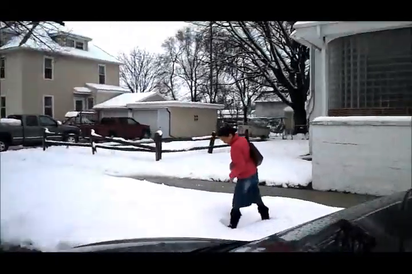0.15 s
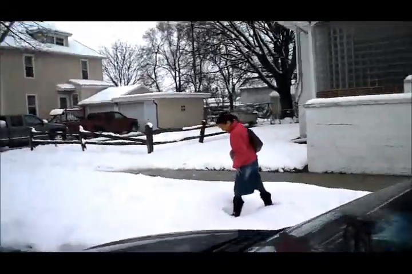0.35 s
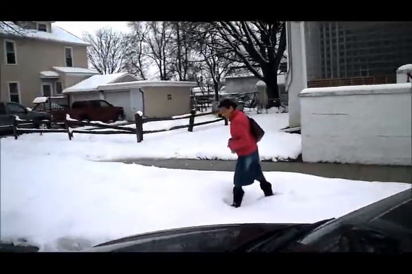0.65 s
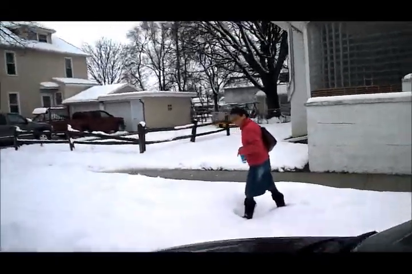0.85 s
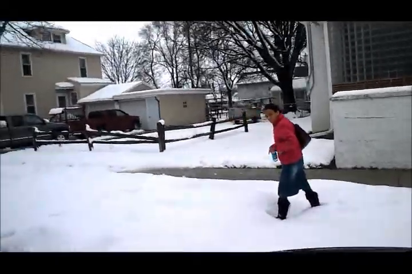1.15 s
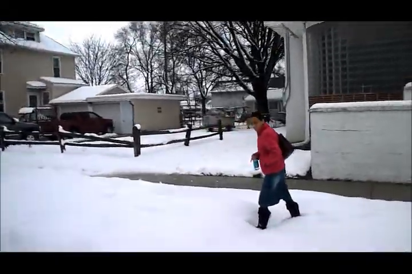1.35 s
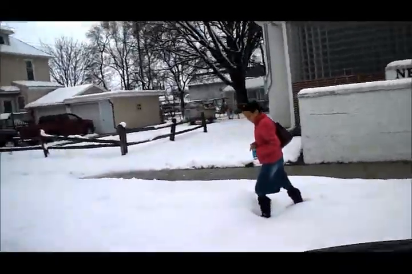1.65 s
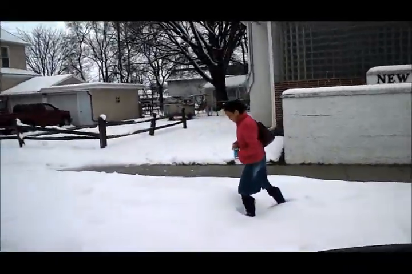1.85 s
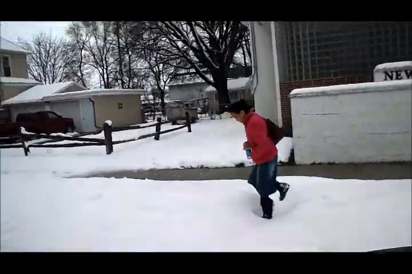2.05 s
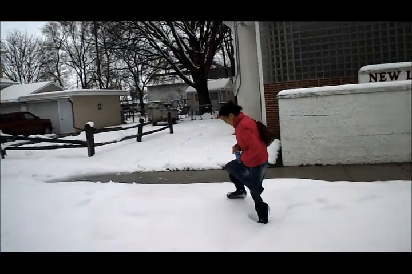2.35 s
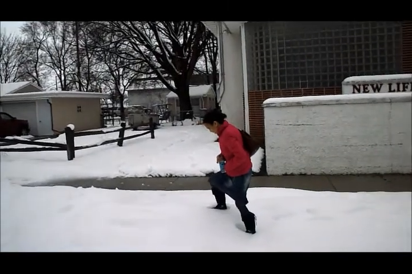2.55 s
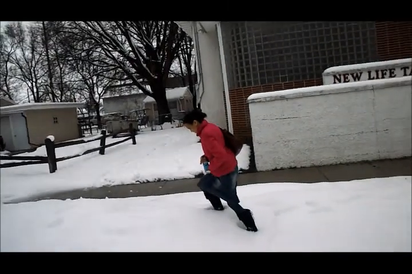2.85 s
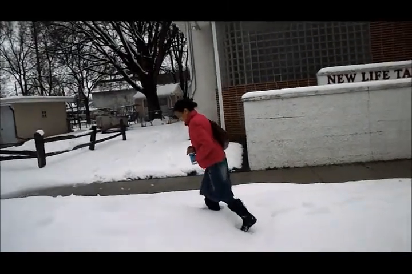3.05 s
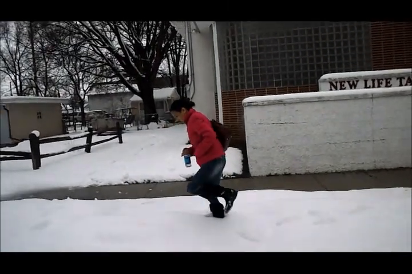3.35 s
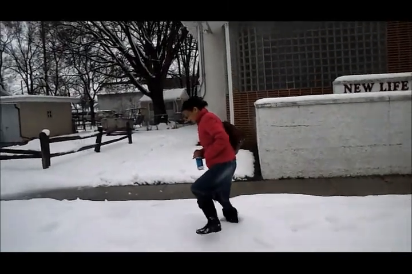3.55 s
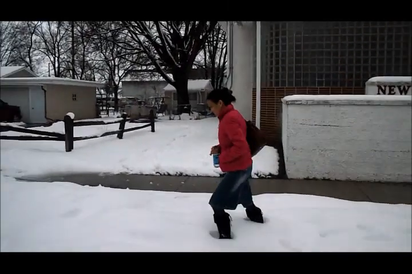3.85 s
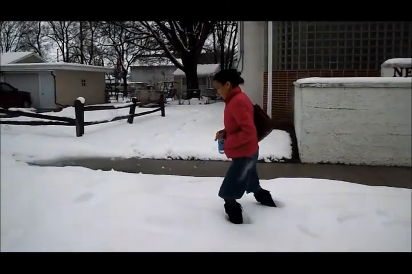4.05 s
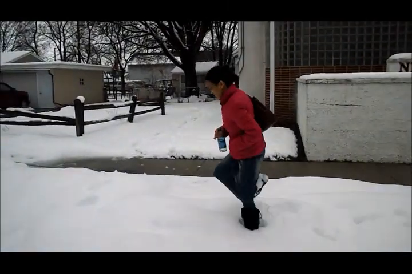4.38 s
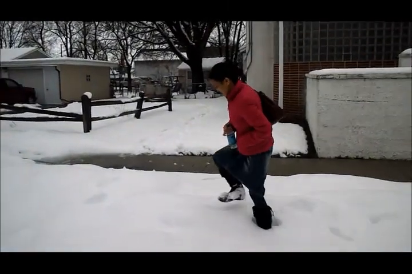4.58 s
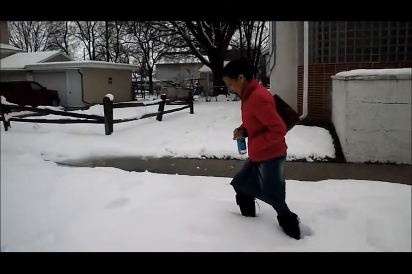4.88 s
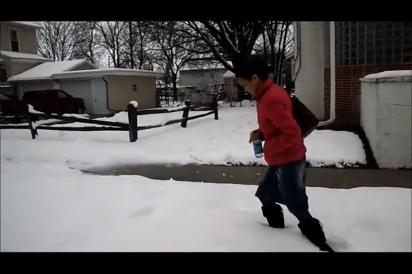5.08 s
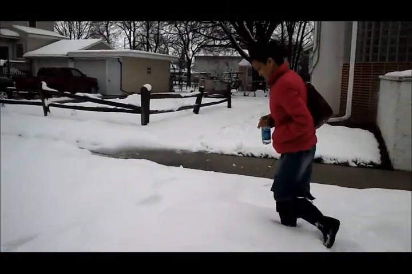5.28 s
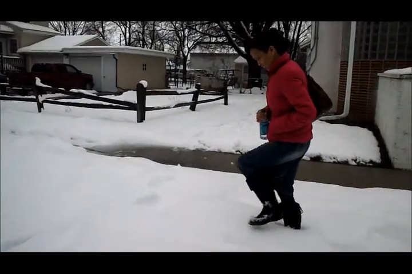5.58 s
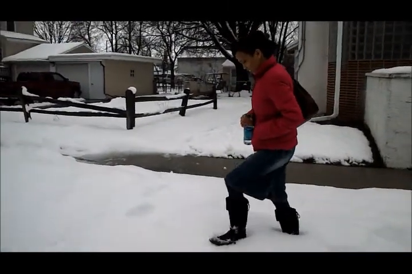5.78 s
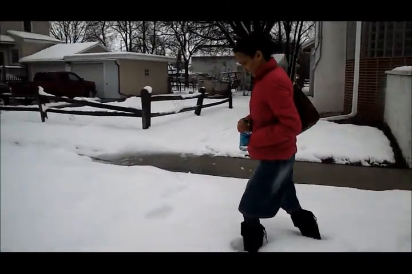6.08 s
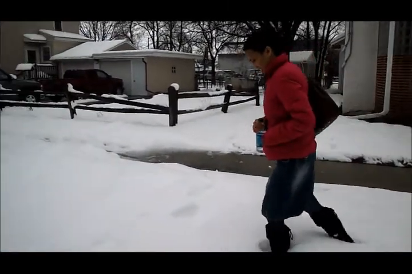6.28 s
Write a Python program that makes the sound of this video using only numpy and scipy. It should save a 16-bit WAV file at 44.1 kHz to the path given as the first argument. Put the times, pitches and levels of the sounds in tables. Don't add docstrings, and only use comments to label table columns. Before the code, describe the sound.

Outdoors in a quiet snowy yard, boots wade slowly a few metres away with soft, dull crunches and faint low booms, mostly in the first four seconds. Distant sparrows chirp and whistle with slight echo from walls. Close fingers tick the plastic recorder body, loudest near 1.4 seconds, then rub it near the end. Steady grainy hiss and a thin high electrical whine remain throughout.

```python
import sys
import numpy as np
from scipy import signal
from scipy.fft import rfft, irfft, next_fast_len
from scipy.io import wavfile
from scipy.ndimage import uniform_filter1d

SR = 44100
rng = np.random.default_rng(int(sys.argv[2]) if len(sys.argv) > 2 else 0)


def digitize_waveform(pressure):
    field = np.atleast_2d(pressure).T
    bounded = np.clip(field, -1, 1)
    quanta = np.round(bounded * 32767).astype(np.int16)
    wavfile.write(sys.argv[1], SR, quanta)


def undo_db(level):
    steps = np.asarray(level, float) / 20
    return 10 ** steps


N = 283154

# pitch in Hz, level in dB, decay to -60 dB in seconds.
CASE_MODES = [
    [(1946, -0.5, 0.012), (2210, 5, 0.011), (2690, -1, 0.0068)],
    [(797, 0, 0.023)],
    [(989, -8, 0.034), (1260, 3, 0.019), (1510, 3, 0.012)],
    [(4006, 18, 0.0025), (2764, -4, 0.013), (3420, -3.5, 0.0086), (4024, 10, 0.004), (4370, -10.5, 0.0038),
     (4770, 8.5, 0.0046), (5170, -1, 0.0088)],
    [(7340, 5, 0.0013), (5870, 5.5, 0.0076), (6550, -1.5, 0.0082), (7470, 2.5, 0.0071),
     (8550, -4.5, 0.0075), (9040, -3, 0.0022)],
]
# start in seconds, lid level in dB, panel level in dB, snap level in dB.
HAND_TICKS = [
    (0.4682, -29, -41.5, -53),
    (1.95, -19, -30.5, -28.5),
    (2.1729, -37, -45.5, -39),
    (2.309, -18.5, -38, -33.5),
    (3.9631, -26.5, -35.5, -34),
    (4.561, -21.5, -24, -29),
    (4.7188, -34, -47, -41),
    (4.9187, -39, -34, -39.5),
    (4.987, -38, -46, -42),
    (5.5024, -30, -43, -43),
]
SLIP_DELAY = .0016


def unit(x):
    return x / np.sqrt(np.mean(x ** 2))


def colour(x, points):
    hz, db = np.transpose(points)
    size = next_fast_len(N)
    f = np.arange(size // 2 + 1) * SR / size + 1
    gain = undo_db(np.interp(np.log(f), np.log(hz), db))
    return irfft(rfft(x, size) * gain, size)[:N]


def band(x, lo_hz, hi_hz, order=2):
    return signal.sosfilt(signal.butter(order, (lo_hz, hi_hz), "bandpass", fs=SR, output="sos"), x)


def walk(rate):
    hold = max(int(SR / rate), 1)
    steps = np.repeat(rng.standard_normal(N // hold + 1), hold)
    return unit(uniform_filter1d(uniform_filter1d(steps, hold), hold)[:N])


def grains(rate, spread_db):
    moment, side, size = rng.random((3, N))
    return (moment < rate / SR) * np.sign(side - .5) * undo_db(-spread_db * np.log(size + 1e-4))


def ring(x, hz, t60):
    r = np.exp(-np.log(1000) / (t60 * SR))
    angle = 2 * np.pi * hz / SR
    return signal.lfilter([0, np.sin(angle)], [1, -2 * r * np.cos(angle), r * r], x)


def ring_all(x, modes):
    return unit(sum((-1) ** k * undo_db(db) * ring(x, hz, t60) for k, (hz, db, t60) in enumerate(modes)))


def swells(rows, attack, release, lost_db):
    t = np.arange(N) / SR
    for s, hold, db, *_ in rows:
        end = s + hold
        times = [s - 2 * attack, s - attack, s, end, end + release, end + 2 * release]
        levels = db - lost_db * np.array([4, 1, 0, 0, 1, 4])
        yield undo_db(np.interp(t, times, levels, left=-200, right=-200))


def hiss():
    # frequency in Hz, density in dB per Hz.
    port = [(18, -67), (30, -50), (48, -56), (114, -29), (499, -11.5), (593, -10), (759, -7), (1480, -5),
            (1990, 2), (2540, -9), (4710, -2.5), (5600, -5.5), (6180, -4), (9640, -11), (10900, -5.5),
            (14200, -49), (22000, -120)]
    noise = unit(colour(rng.standard_normal(N), port))
    low = band(noise, 40, 1600)
    return undo_db(-44 - 0.29) * (noise * undo_db(0.51 * walk(3.344)) + low * 0.071 * walk(14.0))


def whine():
    # sideband number in steps from the tone, level in dB rms.
    sidebands = [(-3, -81), (-2, -79), (-1, -76), (0, -69), (1, -72), (2, -86), (3, -94), (4, -95),
                 (5, -94), (6, -89), (7, -93)]
    tone_hz, step_hz = 10740.2, 81.5
    t = np.arange(N) / SR
    return sum(undo_db(db + 3.0) * np.sin(2 * np.pi * (tone_hz + k * step_hz) * t + k * k)
               for k, db in sidebands)


def rumble():
    # start in seconds, hold in seconds, level in dB.
    shifts = [
        (.46, .001, -80),
        (.77, .001, -71),
        (.98, .47, -76.5),
        (1.54, .001, -69),
        (1.7, 0.76, -73.5),
        (2.6, .3, -84),
        (4.11, .001, -74),
        (5.04, .001, -79),
    ]
    still_db = -87.5
    grip = undo_db(still_db) + sum(swells(shifts, attack=.06, release=0.053, lost_db=14))
    return grip * undo_db(-5.0) * unit(band(rng.standard_normal(N), 73, 320))


def along(table, quiet):
    s, *columns = np.transpose(table)
    span = slice(max(int((s[0] - quiet) * SR), 0), min(int((s[-1] + quiet) * SR), N))
    t = np.arange(span.start, span.stop) / SR
    gate = np.clip(np.minimum(t - s[0], s[-1] - t) / quiet + .5, 0, 1)
    return span, gate, [np.interp(t, s, c) for c in columns]


def glides(rows, peak, rise_db, fade_db, bend):
    u = np.linspace(0, 1, 13)
    slide = (1 - bend) * u + bend * (.5 - .5 * np.cos(np.pi * u))
    lost_db = np.interp(u, [0, peak, 1], [rise_db, 0, fade_db])
    return [np.transpose([s + length * u, hz + (last_hz - hz) * slide, db - lost_db])
            for s, length, hz, last_hz, db in rows]


def birds():
    # time in seconds, pitch in Hz, level in dB.
    sparrow = [(.59, 3270, -57), (.63, 3370, -50), (.665, 3510, -43), (.705, 3510, -39), (.722, 3520, -45),
               (.735, 3420, -62), (.755, 3540, -58), (.772, 3550, -64)]
    # start in seconds, length in seconds, first Hz, last Hz, level in dB.
    chirps = [
        (.018, 0.071, 4550, 3300, -40.5),
        (.347, 0.032, 4900, 4220, -36),
        (4.015, .038, 4500, 3830, -45),
        (4.372, 0.074, 4620, 3920, -38),
        (4.572, 0.049, 4020, 3500, -43.5),
        (5.036, .068, 4600, 3420, -39.5),
        (5.272, 0.039, 3200, 2400, -47),
        (5.345, 0.066, 2280, 3100, -44.5),
        (1.695, .035, 7900, 8400, -50),
    ]
    # start in seconds, length in seconds,
    # first Hz, last Hz, level in dB.
    whistles = [(.001, 0.04, 4580, 4500, -42), (.085, 0.077, 3300, 3290, -50.5),
                (.108, 0.016, 4100, 4130, -43), (.241, 0.013, 4230, 4170, -47),
                (.468, 0.047, 3200, 3140, -46), (.55, 0.16, 3420, 3770, -48.5),
                (.815, 0.054, 3570, 3520, -52), (1.44, 0.068, 3385, 3350, -51),
                (1.505, .065, 3160, 3250, -54), (1.55, 0.17, 661, 667, -57), (4.592, .025, 4000, 3860, -55),
                (4.68, 0.11, 3150, 3270, -49), (4.815, .045, 3200, 3210, -59),
                (4.96, 0.058, 4740, 4540, -46), (5.11, 0.072, 3290, 3170, -49.5),
                (5.5, 0.11, 3205, 3170, -53)]
    # delay in seconds, level in dB.
    echoes = [
        (.028, -13),
        (.061, -19),
    ]

    song, waver = np.zeros(N), 1 + 0.0057 * walk(120)
    calls = [sparrow] + glides(chirps, peak=0.29, rise_db=18, fade_db=18, bend=0.85)
    calls += glides(whistles, peak=0.55, rise_db=11.5, fade_db=10.4, bend=0.11)
    for call in calls:
        span, gate, (hz, db) = along(call, quiet=.012)
        song[span] += gate * undo_db(db + 4.5) * np.sin(2 * np.pi * np.cumsum(hz * waver[span]) / SR)

    t = np.arange(SR // 2) / SR
    trees = rng.standard_normal(len(t)) * np.exp(-np.log(1000) * t / 0.57) * (t > .015)
    smear = undo_db(-15.0) * signal.fftconvolve(song, trees / np.sqrt(np.sum(trees ** 2)))[:N]
    return song + smear + sum(undo_db(db) * np.roll(song, int(lag * SR)) for lag, db in echoes)


def boots():
    # pitch in Hz, level in dB, decay to -60 dB in seconds.
    snow = [(500, -2.5, 0.017), (630, -2, 0.018), (762, 4, 0.049), (980, 5, 0.0095), (1280, 6, 0.013),
            (1700, -6, 0.0098)]
    # start in seconds, hold in seconds, level in dB.
    crunches = [(.228, .001, -46), (.7, .001, -56), (.852, 0.011, -56), (.998, .001, -50),
                (1.15, .001, -56), (1.29, 0.19, -53), (1.52, 0.29, -56), (1.832, .001, -53),
                (1.89, 0.036, -52), (1.98, 0.073, -56), (2.2, .001, -49.5), (2.252, .001, -44),
                (2.35, 0.014, -49.5), (2.558, .001, -50), (2.72, 0.14, -53.5), (2.95, 0.18, -46),
                (3.232, .001, -56), (3.4, .001, -55), (3.54, .001, -51), (3.95, .001, -52),
                (4.662, .001, -60), (5.7, .001, -56), (5.8, 0.0011, -58)]
    # start in seconds, hold in seconds, level in dB.
    thuds = [
        (.74, 0.12, -64.5),
        (.998, .01, -66),
        (1.15, 0.28, -61),
        (1.83, .018, -57.5),
        (1.935, .001, -66),
        (2.004, .001, -52),
        (2.2, 0.08, -64.5),
    ]
    lumps = unit(sum(undo_db(db) * unit(ring(grains(300, 2.7), hz, t60)) for hz, db, t60 in snow))
    crumbs = undo_db(-7.5) * unit(band(grains(150, 3.6), 500, 3000))
    crunch = band(lumps, 430, 2500) + crumbs
    thud = unit(band(ring(grains(120, 1.3), 287.0, 0.08), 207, 370))
    crunch_gain = sum(swells(crunches, attack=0.034, release=.045, lost_db=20.5))
    thud_gain = sum(swells(thuds, attack=0.028, release=0.048, lost_db=15))
    return crunch_gain * crunch + undo_db(-2.0) * thud_gain * thud


def ticks():
    # start in seconds, lid level in dB, panel level in dB, snap level in dB.
    seam_ticks = [(1.0713, -28, -36, -47), (1.3684, -29.5, -52, -37.5), (1.4326, -4.5, -18, -11.5),
                  (1.494, -18, -30, -26), (2.0882, -10.5, -40, -17), (2.326, -11.5, -25, -31),
                  (2.9075, -31.5, -50, -37.5), (3.5601, -20, -63, -23), (3.7334, -32.5, -50, -42),
                  (4.2196, -24.5, -45, -38.5), (4.4099, -13, -25.5, -33), (4.5019, -32, -42.5, -40),
                  (5.0039, -38, -40.5, -50), (5.4924, -25, -32.5, -23.5), (5.5599, -22, -46, -21.5),
                  (5.8224, -36, -41, -40.5), (5.8565, -34, -40, -29.5), (5.9367, -15, -63, -22),
                  (6.2385, -30, -44, -32), (6.4063, -30.5, -46, -29.5)]
    hand_shell_db, seam_shell_db = 2.7, -11.5
    share_db, detune = 1.5, .018
    tick_size, slip_size = 2048, 96
    out, t = np.zeros(N + tick_size), np.arange(tick_size) / SR
    rows = [(*row, hand_shell_db) for row in HAND_TICKS] + [(*row, seam_shell_db) for row in seam_ticks]
    for s, lid_db, panel_db, snap_db, shell_db in rows:
        slips = .05 * rng.standard_normal(slip_size) * np.exp(-t[:slip_size] / .0011)
        slips[0] = 1
        edge_db = -40 + 0.85 * (snap_db + 29.5)
        group_db = [lid_db - 8.5, panel_db + shell_db, panel_db, snap_db, edge_db]
        for modes, energy_db in zip(CASE_MODES, group_db):
            ringing = np.zeros(tick_size)
            for k, (hz, db, t60) in enumerate(modes):
                mode_hz = hz * (1 + detune * rng.standard_normal())
                gain = (-1) ** k * undo_db(db + share_db * rng.standard_normal())
                ringing += gain * np.sin(2 * np.pi * mode_hz * t) * np.exp(-np.log(1000) * t / t60)
            part = np.convolve(ringing, slips)[:tick_size]
            part = undo_db(energy_db + 21.0) * part / np.sqrt(np.sum(part ** 2))
            out[int((s + SLIP_DELAY) * SR):][:tick_size] += part
    return out[:N]


def jolts():
    push = np.zeros(N)
    for s, _, panel_db, _ in HAND_TICKS:
        push[int((s + SLIP_DELAY) * SR)] = undo_db(panel_db + 20 - 3.5)
    return band(push, 230, 640, order=1)


def rubs():
    # start in seconds, hold in seconds, level in dB, bright share in dB, shell share in dB.
    strokes = [(4.807, 0.084, -55.5, 15, -10), (5.411, 0.0091, -40, 13.5, -2.5),
               (5.421, .003, -35.5, 1, -4), (5.436, .001, -43.5, 8, -6), (5.457, 0.0072, -44.5, 11.5, -12),
               (5.467, 0.023, -38.5, 6, -14), (5.504, .002, -39, 1, 1), (6.178, .001, -32, 5, -16),
               (6.213, .001, -31.5, 2, -8.5), (6.194, 0.015, -46.5, 9, -6), (6.411, 0.0018, -41, 8, -11)]
    skin = grains(3500, 2.7) * undo_db(1.7 * walk(150))
    lid, shell, panel, snap, edge = (ring_all(skin, modes) for modes in CASE_MODES)
    bright = 0.44 * snap + 0.26 * edge + 0.19 * unit(band(skin, 3400, 7800))
    body = 0.97 * shell + 0.17 * panel
    gains = swells(strokes, attack=0.0042, release=0.015, lost_db=14.3)
    return sum(gain * (lid + undo_db(bright_db) * bright + undo_db(shell_db) * body)
               for gain, (*_, bright_db, shell_db) in zip(gains, strokes))


def converter(x):
    # frequency in Hz, gain in dB.
    rolloff = [(10100, 0.5), (10400, -6), (10700, -9.5), (11000, -37), (11400, -26), (12000, -46)]
    return colour(x, rolloff)


def scene():
    case = band(ticks() + rubs(), 775, 10600, order=4) + jolts()
    sound = converter(hiss() + case + boots() + rumble() + birds()) + whine()
    return np.array([sound, sound])


def roll_off(x):
    return signal.sosfilt(signal.butter(12, 16000, fs=SR, output="sos"), x)


def record(dry):
    ceiling = .8
    overload = band(dry - np.clip(dry, -ceiling, ceiling), 250, 20000)
    return roll_off(dry - overload)


dry = scene()
out = record(dry)
digitize_waveform(out)
```